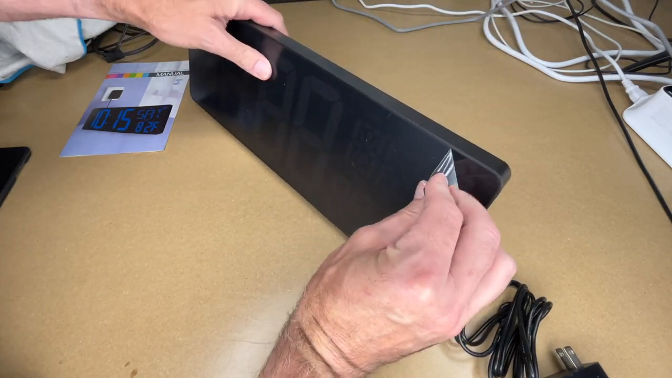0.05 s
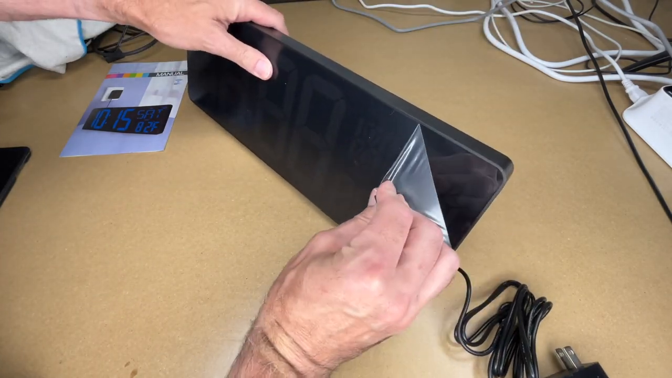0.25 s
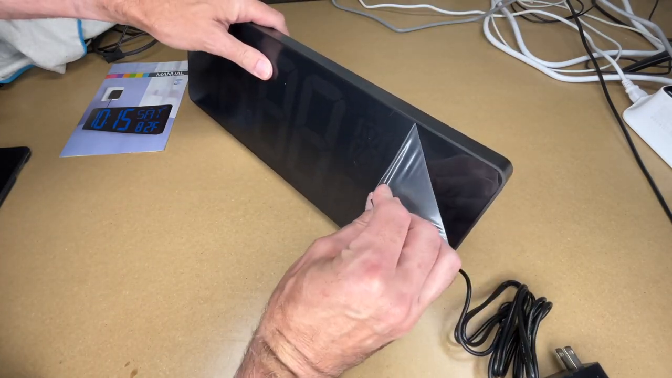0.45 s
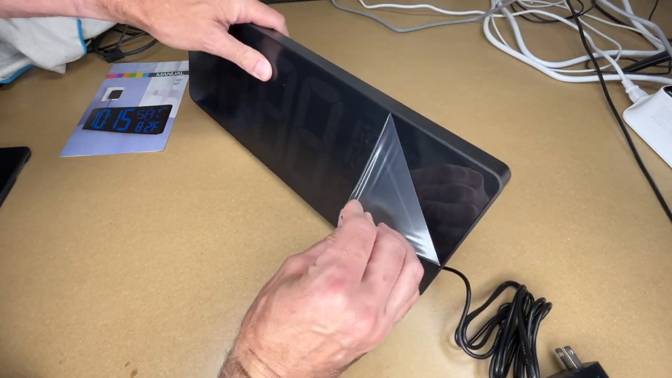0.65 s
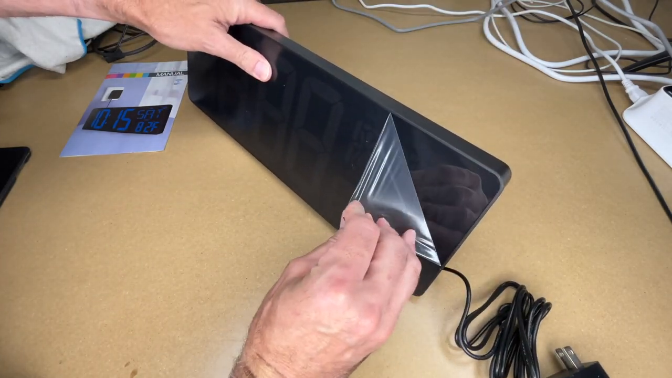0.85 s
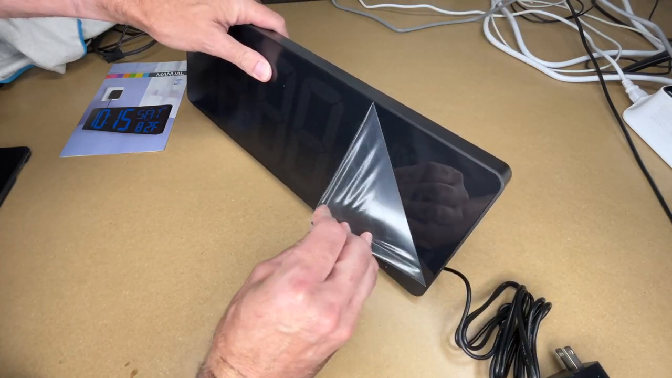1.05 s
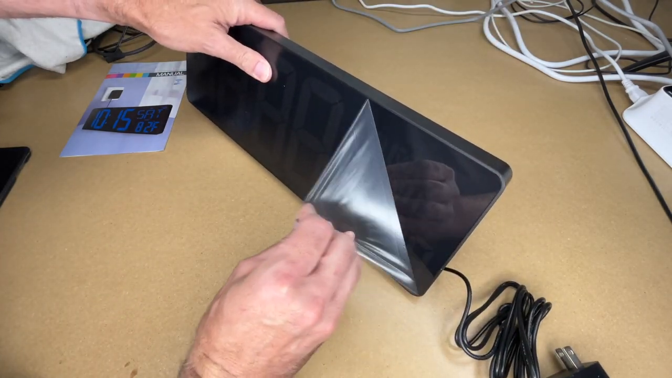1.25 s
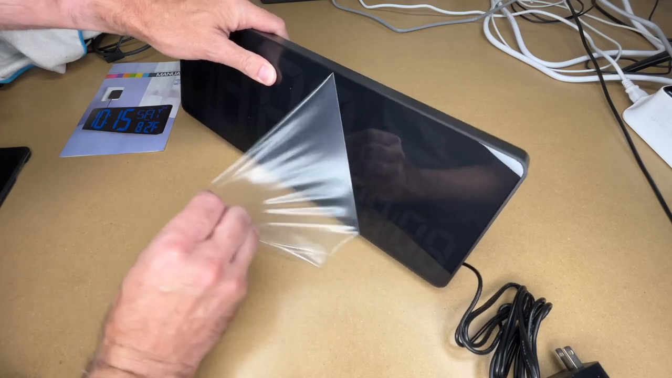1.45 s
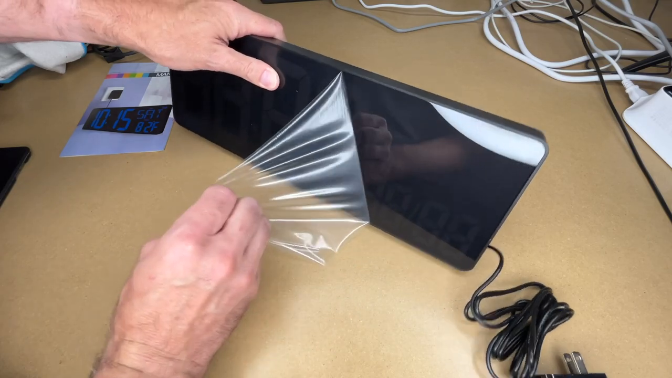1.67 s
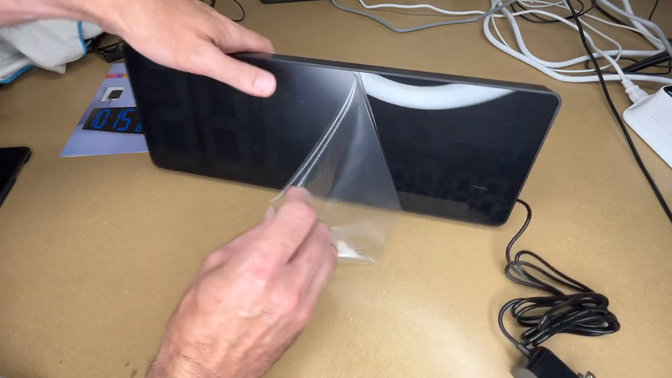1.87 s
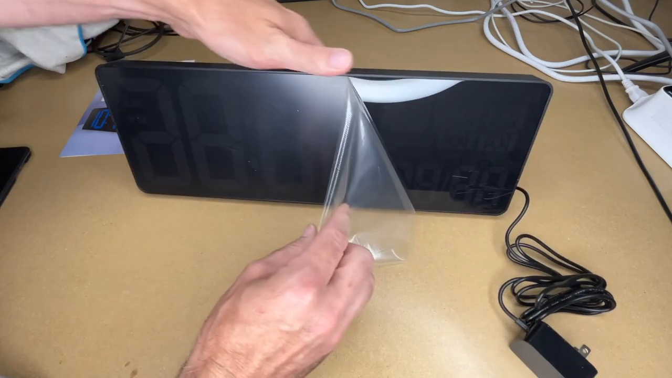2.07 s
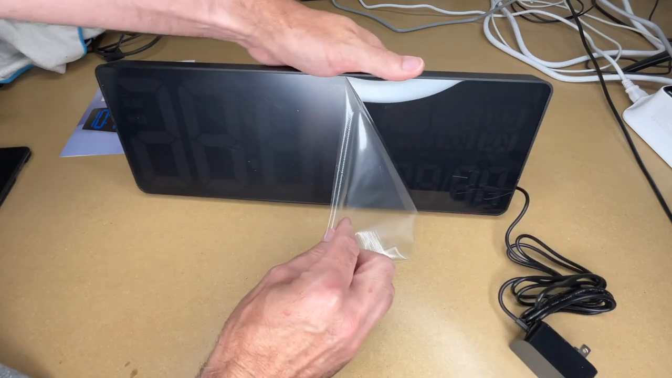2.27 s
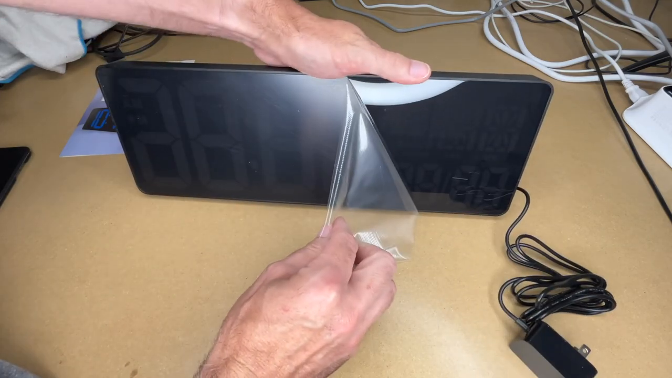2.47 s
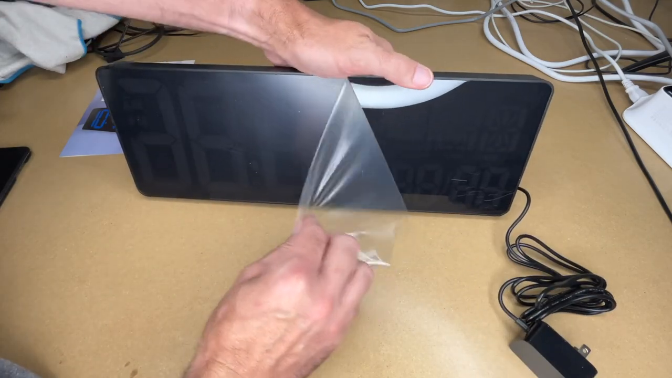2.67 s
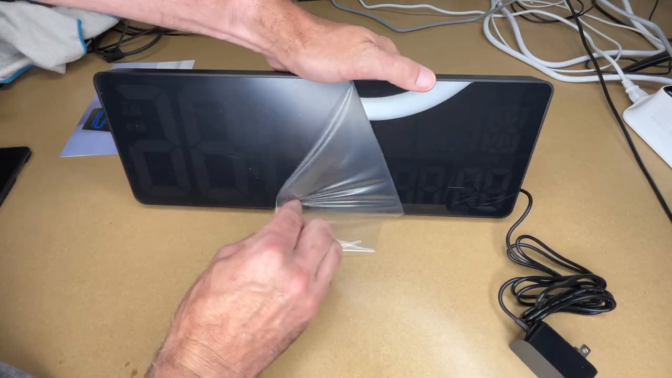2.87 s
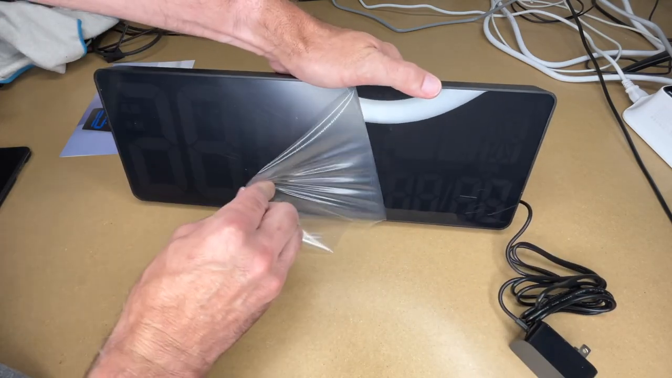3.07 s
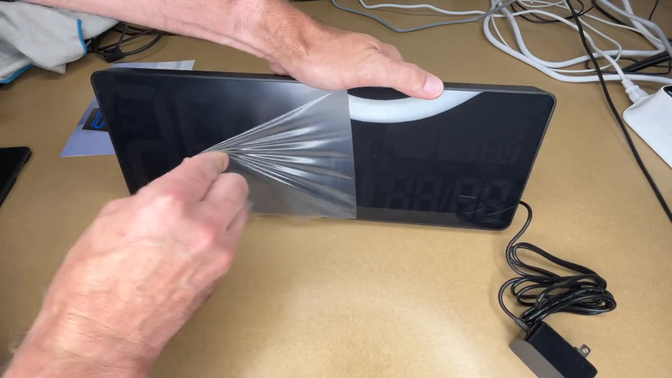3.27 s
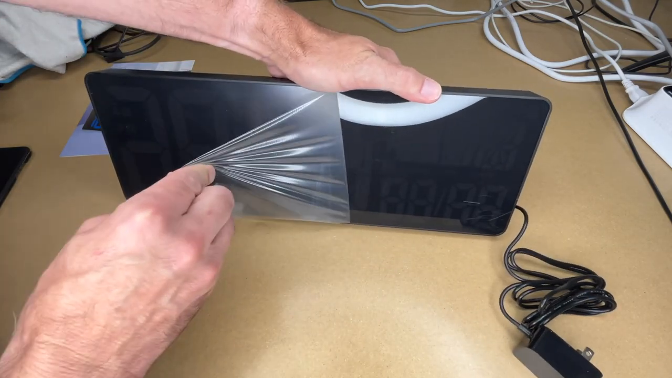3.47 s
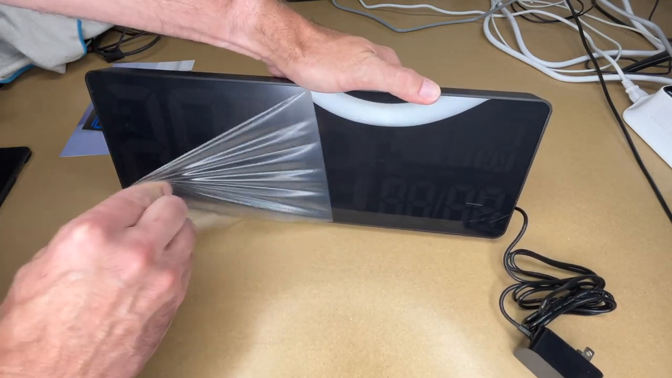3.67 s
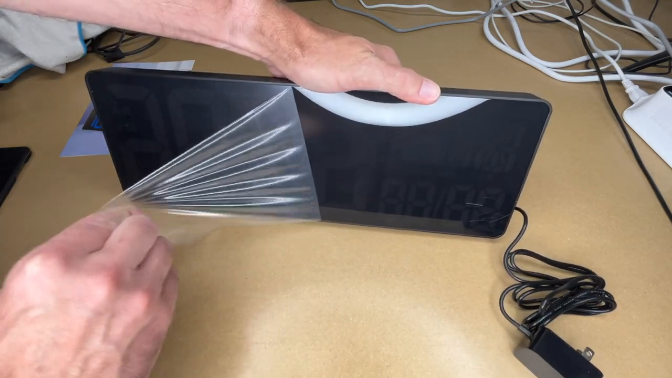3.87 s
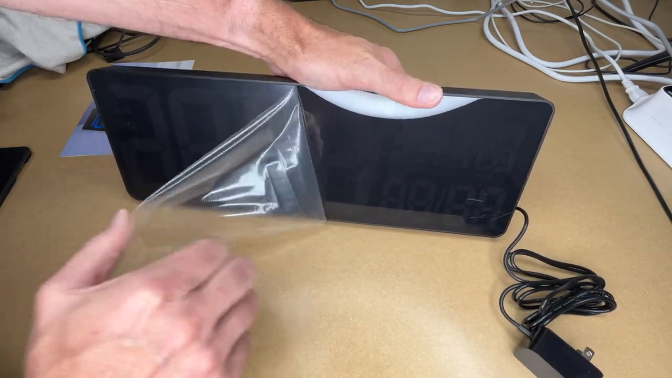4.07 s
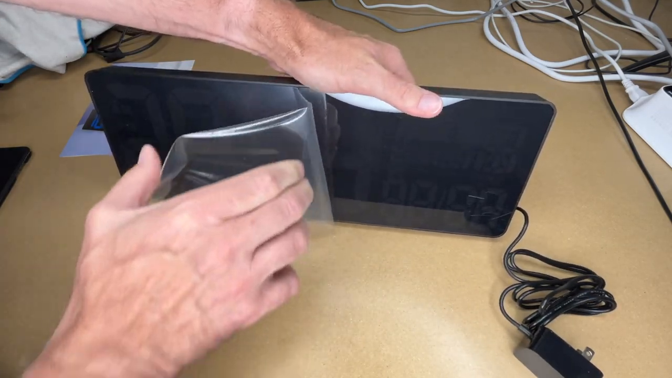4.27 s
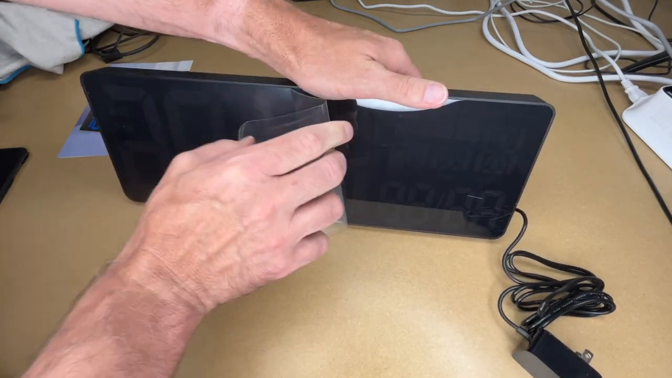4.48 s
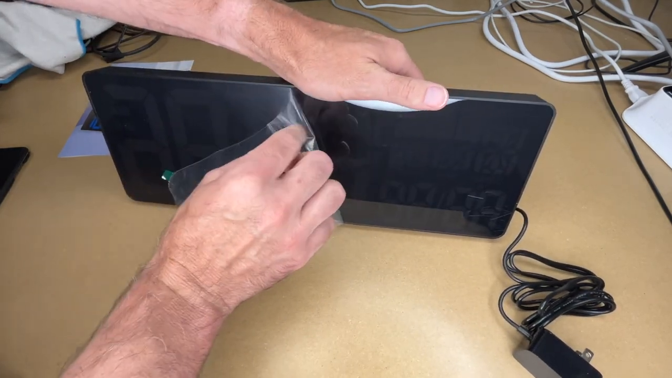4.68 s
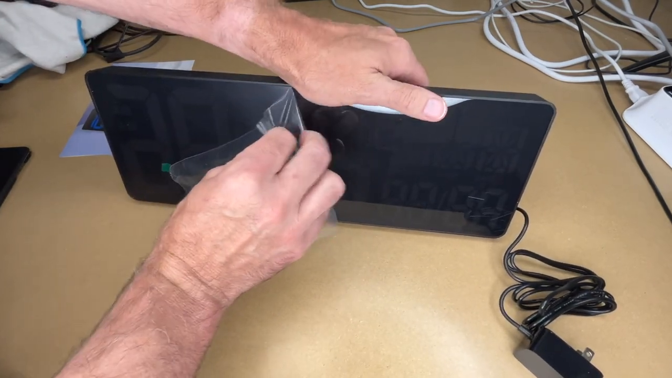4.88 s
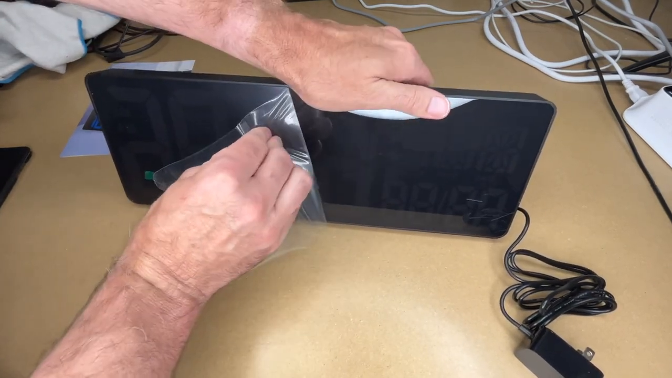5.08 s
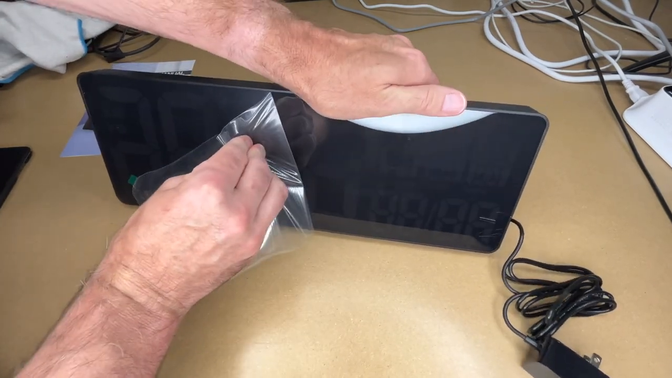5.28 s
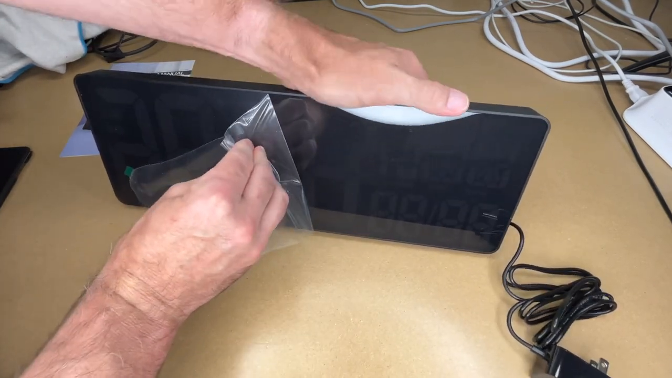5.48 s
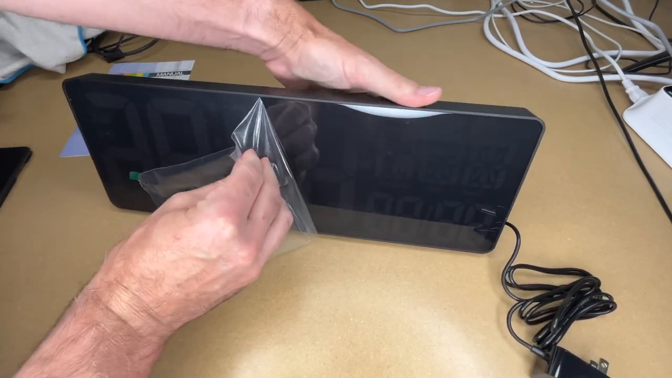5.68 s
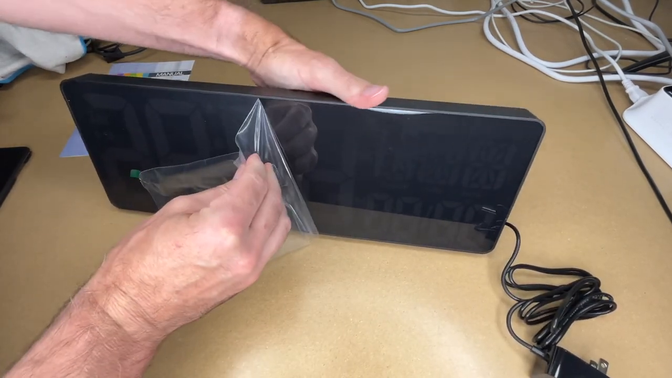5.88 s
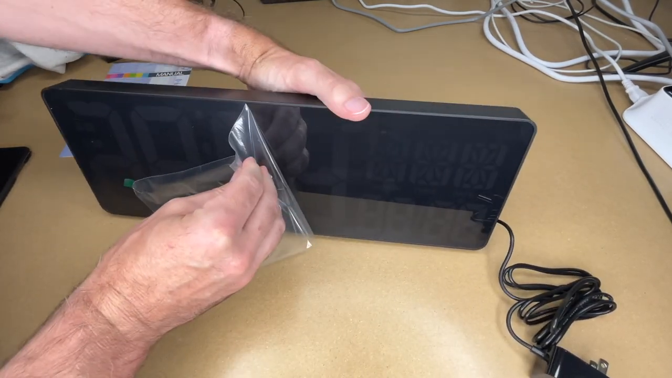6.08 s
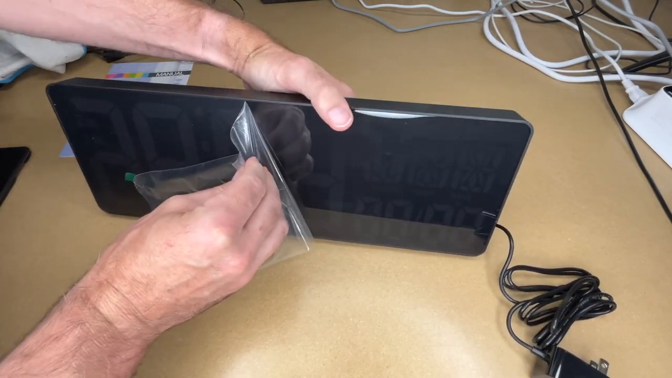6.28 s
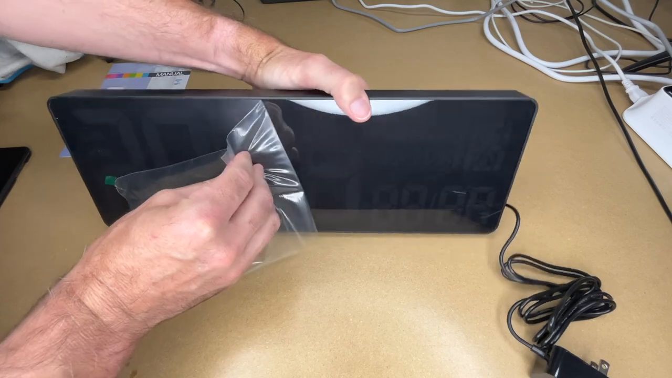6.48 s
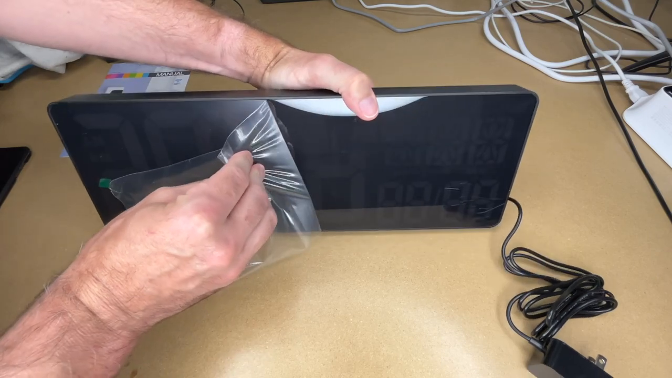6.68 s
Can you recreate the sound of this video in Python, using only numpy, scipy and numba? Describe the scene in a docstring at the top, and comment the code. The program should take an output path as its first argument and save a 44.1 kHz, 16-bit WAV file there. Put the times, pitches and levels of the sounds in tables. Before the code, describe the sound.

Sticky clear film rips from a hard panel in buzzing bursts, pauses, rips again, then quiet finger crinkles and soft knocks on a desk.

```python
"""A faint tap, then rasping bursts as protective film is pulled off a plastic panel on a desk; later, quieter crinkling.
The glue lets go in trains of slips, each a short ring of the taut film with a spit of treble.
Fingers rustle the film with dense tiny releases; the sheet drums, and the panel hums and knocks on the desk.
The desk booms when bumped. A small room adds short tails over faint air noise, the same in both channels."""
import sys
import numpy as np
from scipy import signal
from scipy.fft import rfft, irfft, next_fast_len
from scipy.io import wavfile
from scipy.ndimage import uniform_filter1d
from numba import njit

SR = 44100
rng = np.random.default_rng(int(sys.argv[2]) if len(sys.argv) > 2 else 0)


def wav_record(signal):
    """Record a signal, one row per channel, as 16-bit PCM in the file named by sys.argv[1]."""
    frames = np.transpose(np.atleast_2d(signal))
    bounded = np.clip(frames, -1, 1)
    # unit amplitude maps onto the largest positive 16-bit level
    quanta = np.round(bounded * 32767).astype(np.int16)
    wavfile.write(sys.argv[1], SR, quanta)


N = 297234  # length in samples

# Trains of glue slips: start_s, end_s, first_gap_ms, last_gap_ms, gap_unevenness (0-1), level_db,
# softer_at_start_db, film_pitch_hz, treble_against_body_db
SLIP_TRAINS = [(0.155, 0.284, 10.56, 22.3, .25, -20.5, 3.5, 1140, -0.5),
               (0.5244, 0.622, 6.56, 11.05, 0.09, -12, 15, 3555, -1),
               (0.92, 1.034, 10.06, 9, .12, -13, 2.5, 3040, -5),
               (1.0518, 1.079, 5.2, 23.5, .05, -12, 4, 3180, -6),
               (1.2605, 1.375, 6.6, 10, .08, -11, 2.5, 1458, -12),
               (3.2161, 3.293, 7.04, 15.1, .04, -12.5, -1.2, 1640, -6),
               (3.5571, 3.614, 6.5, 10.36, 0.11, -13, 3.5, 1629, -10),
               (3.6701, 3.732, 7.83, 9.5, .06, -12.5, -1.8, 2050, -11.5),
               (5.7172, 5.772, 8, 9, .12, -39, 2.9, 4120, 5)]
SWELL_S, SLOWING = 0.034, 3  # time constant of the swell; power that makes the gaps change late in a train
SLIP_SPREAD_DB, PITCH_SPREAD = 1.02, .2  # random level and pitch (natural log) from slip to slip


def slip_trains():
    """Stretched film sticks and slips; the gaps between slips drift from the first to the last value."""
    rows = []
    for start, end, gap_ms, last_ms, uneven, db, softer_db, hz, treble_db in SLIP_TRAINS:
        s = start
        for a, b, c, d in np.clip(rng.standard_normal((40, 4)), -2, 2):
            if s < end:
                soft_db = softer_db * np.exp(-(s - start) / SWELL_S)
                level_db = db - soft_db + SLIP_SPREAD_DB * a
                rows.append((s, level_db, hz * np.exp(PITCH_SPREAD * b), treble_db + 1.3 * c))
                progress = ((s - start) / (end - start)) ** SLOWING
                next_ms = gap_ms + (last_ms - gap_ms) * progress
                s += next_ms * np.exp(uneven * d) / 1000
    return rows


CREASES_PER_S, CREASE_DB, CREASE_HZ = 28, 2, 3300  # average rate, level over the rustle, middle pitch


def creases(rustle_db):
    """Small creases snap at random moments, their level following the rustling."""
    when = np.cumsum(rng.exponential(size=600)) / CREASES_PER_S
    a, b, c = rng.standard_normal((3, 600))
    under_db = rustle_db[np.minimum(when * SR, N - 1).astype(int)]
    rows = zip(when, under_db + CREASE_DB + 4 * a, CREASE_HZ * np.exp(0.29 * b), -5 + 5 * c)
    return [row for row in rows if row[0] < N / SR]


# Single snaps of the film: time_s, level_db, film_pitch_hz, treble_against_body_db
SINGLE_SNAPS = [(.4787, -61.5, 5000, 3.5), (.7598, -50, 4800, -6), (1.2422, -28, 1440, -1.5),
                (1.251, -18, 3250, -9.5), (1.4928, -21, 3800, -12), (1.5091, -23.5, 1460, -7),
                (2.1442, -51, 3130, -16), (2.5924, -55, 3250, -11), (2.6258, -41, 3200, -23.5),
                (2.6717, -47.5, 2980, -11.5), (2.6953, -48, 1530, -9), (3.018, -28.5, 3270, -1),
                (3.0949, -24, 3400, -8), (3.1162, -21, 3200, -6), (3.1327, -14.5, 1480, 1),
                (3.1986, -27, 2200, -3), (3.3374, -38.5, 2805, -2), (3.3839, -23.5, 4740, -6),
                (3.4244, -38.5, 3570, 0.5), (3.4857, -39.5, 1405, -14), (3.5411, -34, 1410, -3),
                (3.6551, -14, 1406, -11), (3.8009, -14.5, 1530, -11.5), (3.8136, -10.5, 1910, -17),
                (3.8375, -20, 1794, -10.5), (3.8543, -31, 1660, -13), (3.8922, -24.5, 4720, 3.5),
                (3.9021, -27.5, 4740, 5), (3.9687, -35, 4720, 3), (3.9749, -34.5, 1420, -1.5),
                (4.1624, -55.5, 3890, -11), (4.319, -57, 1590, -4), (4.4611, -49.5, 3530, -3.5),
                (4.4801, -42.5, 4260, -11), (4.5157, -32.5, 3200, 0), (4.6812, -44, 3430, 1.5),
                (4.7978, -42, 4490, 5), (4.8018, -43.5, 4330, 10), (4.9, -35, 4950, -2),
                (4.9107, -27, 4160, 7), (4.9143, -25.5, 1730, 1), (4.9194, -26, 1300, -4.5),
                (4.9594, -41, 1490, 8), (4.9822, -43.5, 4760, 3), (5.0786, -34, 1964, -9.5),
                (5.1849, -49.5, 3530, -10), (5.2663, -37, 1670, -11.5), (5.2992, -41.5, 3720, 3.5),
                (5.4803, -44, 3210, -19.5), (5.5034, -39, 4130, -23), (5.5529, -45.5, 1860, -9),
                (5.5777, -38.5, 1850, -7), (5.666, -34, 1650, -1), (5.6824, -36, 1480, 8),
                (5.6943, -31, 1710, 4), (5.7107, -42, 2840, -3), (5.816, -44.5, 3900, -16),
                (5.9546, -48.5, 3830, -15.5), (6.0009, -45.5, 4220, 6), (6.013, -41, 2910, 4.5),
                (6.1961, -53.5, 4970, -16), (6.4388, -38, 4520, 4.5), (6.4479, -33.5, 3390, -10),
                (6.4621, -33.5, 4800, -13), (6.4736, -33, 2200, -8), (6.48, -33, 1680, -8),
                (6.5143, -28, 3950, 0.5), (6.5305, -36.5, 4720, 10), (6.5464, -34, 3900, 6),
                (6.5571, -36.5, 3930, 6), (6.5743, -38, 4420, 6.5), (6.6415, -46.5, 4970, 12.5),
                (6.6563, -46.5, 3810, 6.5)]


def releases(rustle_db):
    """Every snap of the film as time_s, level_db, pitch_hz, treble_db: single snaps, trains and creases."""
    return list(SINGLE_SNAPS) + slip_trains() + creases(rustle_db)


# Tone colour of the tearing: frequency_hz, relative_level_db
RIP_COLOUR = [(200, -92.5), (600, -36), (1100, 3), (1500, 4.5), (3000, 3.5), (4500, 6), (6500, -21),
              (12000, -59)]
# Tone colour of the bright hiss: frequency_hz, relative_level_db
HISS_COLOUR = [(1000, -76), (3500, -22.5), (5000, 0), (7000, 3), (9000, -1), (11000, -5), (12000, -16),
               (13000, -21.5)]


def slips(rows):
    """Each release of glue rings the film for a few cycles and spits treble; also returns the bare pulses."""
    t = np.arange(SR // 50) / SR
    shape = (1 - np.exp(-t / .0004)) * amp(-60 * t / .012) / .53  # fast attack, 60 dB down in 12 ms
    tear = unit(coloured(rng.standard_normal(N), RIP_COLOUR))
    fizz = unit(coloured(rng.standard_normal(N), HISS_COLOUR))

    def sized(x):
        """Shape a sound, giving it the energy of an equally shaped sine of height 1."""
        shaped = x * shape
        return shaped * np.linalg.norm(shape) / np.linalg.norm(shaped) / 2 ** .5

    out, beat = np.zeros((2, N + SR))
    for (s, db, hz, treble_db), phase in zip(rows, rng.random(1000)):
        i = min(round(s * SR), N - len(t))
        at = slice(i, i + len(t))
        # starts 6% above the given pitch and sags as the film slackens
        ring = np.sin(2 * np.pi * (1.06 * hz * t * (1 - 40 * t) + phase))
        treble = amp(treble_db)
        mix = sized(ring + .75 * tear[at]) + treble * sized(fizz[at])
        out[at] += amp(db) * mix / np.hypot(1, treble)
        beat[at] += amp(db) * shape
    return out[:N], beat[:N]


# Pulls on the film: start_s, rise_s, hold_s, sag_db, rip_db, rip_pitch_hz, hiss_db, hiss_sag_db, drum_db,
# drum_pitch_from_hz, drum_pitch_to_hz, panel_db, panel_pitch_hz
FILM_PULLS = [(0.145, .04, 0.1, 7, -23, 1675, -19, 14.5, -28, 848, 790, -47.5, 195),
              (0.517, .026, 0.086, 12, -18.5, 3006, -20.5, 10.5, -23, 520, 400, -48, 206),
              (0.914, .025, .135, 9.5, -19.5, 2670, -17.5, 16.5, -26, 697.4, 379, -43, 200),
              (1.24, .055, 0.1, 9, -11.5, 1437, -13, 11.5, -22, 350, 380, -29.5, 185),
              (1.344, .025, 0.14, 11, -21, 1483, -30.5, -3, -23.5, 733.6, 810, -45.5, 180),
              (2.888, .026, 0.087, 24.5, -37, 3450, -42.5, 17, -46, 599, 562.6, -53, 186),
              (3.009, .008, 0.041, 8, -34.5, 2750, -35, 12.5, -41, 314.3, 322, -39.5, 183),
              (3.091, .01, 0.029, -3, -27.5, 2393, -34.5, -8.5, -38.5, 473.7, 500, -39, 172),
              (3.196, 0.022, .068, 3.8, -19.5, 1792, -26.5, 8.5, -29.5, 580, 530, -35, 166),
              (3.38, .005, .014, 20, -29, 3782, -46, -1, -43.5, 451, 455, -43, 170),
              (3.482, .006, 0.031, 4.5, -47.5, 1788, -45.5, 9, -59.5, 540, 520, -57, 172),
              (3.544, 0.027, 0.048, 9, -13.5, 1750, -20, 8.5, -26, 665, 610, -34, 150),
              (3.659, .03, 0.057, 19.5, -13.5, 2143, -42, -5, -24, 566, 520, -37, 148),
              (3.789, .025, 0.052, 16, -23.5, 1869, -42, -2, -33, 515.5, 520, -46, 155),
              (3.888, .006, .03, -1, -41, 4267, -29.5, 11, -54.5, 532.4, 535, -78, 196),
              (3.952, .022, .005, 11.5, -46.5, 2990, -44.5, 5.4, -49.5, 540, 541, -67, 199)]
# Fingers rustle the loose film: start_s, rise_s, hold_s, sag_db, rip_db, rip_pitch_hz, hiss_db
FINGER_RUSTLES = [(0.893, .006, .016, -7.5, -57, 2993, -61.5), (.752, 0.0041, 0.017, 9.5, -60, 4434, -55.5),
                  (1.718, .02, .16, -5, -63.5, 1600, -71), (1.876, .02, 0.17, 16, -57.5, 1600, -70.5),
                  (2.117, 0.028, 0.09, 8.5, -66.5, 3030, -70.5), (2.237, 0.029, .12, 8, -68, 1508, -76),
                  (2.594, 0.035, 0.097, -2, -62, 3010, -76.5), (2.7, 0.059, .005, 0.3, -58, 4168, -57),
                  (4.155, 0.0054, .02, 13.5, -59, 3810, -69.5), (4.271, 0.05, .05, 0.2, -77.5, 3010, -87.5),
                  (4.34, .01, .06, 1, -72.5, 3606, -90), (4.408, .008, .09, -7, -62.5, 3965, -64),
                  (4.503, .012, 0.018, 7, -50.5, 1558, -48), (4.665, .015, .04, 9, -63, 1741, -60),
                  (4.757, .008, 0.028, 4.7, -53, 4417, -46.5), (4.887, 0.02, .09, 28, -38.5, 2184, -34.5),
                  (5.071, .008, .03, 16, -50.5, 1925, -61), (5.117, 0.033, 0.1, -9, -71, 2000, -69.5),
                  (5.441, .07, .03, 14, -44, 3150, -61), (5.545, 0.02, 0.0054, 7.4, -52.5, 2725, -41),
                  (5.638, 0.016, .05, 8.5, -49, 2449, -56), (5.684, 0.059, 0.0091, 7.6, -34, 3596, -38),
                  (5.77, 0.013, .09, 9.5, -52, 3300, -76), (5.943, 0.0073, .03, 11.5, -50.5, 3750, -75),
                  (5.969, 0.03, .1, 24, -60.5, 3340, -55.5), (6.133, 0.057, 0.019, 2, -66, 3500, -81.5),
                  (6.252, 0.0047, 0.024, 2.5, -64.5, 1120, -79), (6.329, 0.0088, .03, 5, -68, 1400, -90),
                  (6.367, .01, 0.056, 1.3, -66, 3300, -71), (6.429, .025, 0.11, 22, -45.5, 3002, -35.5),
                  (6.626, 0.027, 0.008, 8.05, -71, 3960, -62)]
# The panel is shifted on the desk: start_s, rise_s, hold_s, sag_db, drum_db, drum_pitch_hz, panel_db, panel_pitch_hz
PANEL_SHIFTS = [(0, 0.022, 0.023, 11, -57.5, 523, -68, 172), (.893, 0.007, 0.02, -6, -58, 399, -76.5, 201),
                (1.66, 0.089, 0.18, -8.5, -52, 342.5, -53.5, 165.1),
                (1.841, 0.044, 0.089, 1, -49.5, 342.2, -42, 159.8),
                (2.05, .02, 0.21, 0.7, -70, 471, -78, 171),
                (2.319, .045, .005, 1.5, -56, 492.3, -66.5, 197.3),
                (2.63, .055, 0.14, 14.5, -57, 443.4, -66, 164.8),
                (2.771, .05, 0.087, 3, -68.5, 295.8, -67, 159.4),
                (2.941, 0.026, 0.055, -3, -49.5, 292.8, -54, 182.8),
                (4.147, 0.034, 0.0055, -1.7, -65, 603, -85.5, 190),
                (4.293, .05, .05, 2.7, -74, 337.4, -90.5, 192.7),
                (4.4, 0.14, 0.0077, -1, -56, 303, -60, 121.2),
                (4.563, 0.061, 0.072, 26.5, -52.5, 284.5, -50.5, 119.4),
                (4.738, 0.043, 0.0044, 5, -69, 428.3, -82, 144.2),
                (4.853, 0.081, 0.01, 15, -44, 552, -55, 172),
                (4.978, 0.045, 0.0023, 3, -64, 476.3, -94, 171.3),
                (5.13, 0.019, 0.15, -11, -65, 350, -70, 195.5),
                (5.414, 0.015, 0.14, 6, -53.5, 471.6, -66.5, 209.4),
                (5.566, .02, .07, -4, -67, 504.4, -88, 201.1),
                (5.638, 0.008, 0.017, -0.5, -60, 493.7, -81, 196),
                (5.793, 0.02, 0.073, 1, -49.5, 421.7, -69.5, 192.9),
                (5.95, 0.05, 0.065, 12, -68, 386.4, -69, 172),
                (6.178, .012, 0.025, 13, -53.5, 267.2, -48, 169.2),
                (6.249, 0.018, 0.018, 13, -37.5, 478.7, -75, 212),
                (6.332, .012, 0.021, 7.5, -43, 495, -69.5, 194.8),
                (6.415, 0.021, 0.14, 6.5, -46, 350, -43.5, 166)]
# Levels while the hands are still: rip_db, hiss_db, drum_db, panel_db
STILL_DB = [-87.5, -100, -115, -91.5]
HISS_RISE, DRUM_SAG, PANEL_SAG = 0.49, 0.76, 0.72  # shares of the rise and of the sag
LET_GO_DB, DRUM_LET_GO_DB = 11, 2  # drop when a pull stops; the sheet slackens


def controls():
    """Hand movements set the levels and pitches of rip, hiss, drum and panel; also the rustle level alone."""
    (s, rise, hold, sag, rip, rip_hz, hiss, hiss_sag,
     drum, from_hz, to_hz, panel, panel_hz) = np.transpose(FILM_PULLS)
    rs, r_rise, r_hold, r_sag, r_rip, r_hz, r_hiss = np.transpose(FINGER_RUSTLES)
    ms, m_rise, m_hold, m_sag, m_drum, m_hz, m_panel, m_panel_hz = np.transpose(PANEL_SHIFTS)
    long, r_long, m_long = rise + hold, r_rise + r_hold, m_rise + m_hold
    quick = HISS_RISE * rise
    rip_rest, hiss_rest, drum_rest, panel_rest = STILL_DB

    rustle_db = strokes(rip_rest, rs, r_rise, r_hold, r_sag, r_rip)
    pull_rip_db = strokes(rip_rest, s, rise, hold, sag, rip, LET_GO_DB)
    rip_db = np.maximum(rustle_db, pull_rip_db)
    rustle_hiss_db = strokes(hiss_rest, rs, r_rise, r_hold, r_sag, r_hiss)
    pull_hiss_db = strokes(hiss_rest, s, quick, long - quick, hiss_sag, hiss, LET_GO_DB)
    hiss_db = np.maximum(rustle_hiss_db, pull_hiss_db)
    shift_drum_db = strokes(drum_rest, ms, m_rise, m_hold, m_sag, m_drum)
    pull_drum_db = strokes(drum_rest, s, rise, hold, DRUM_SAG * sag, drum, DRUM_LET_GO_DB)
    drum_db = np.maximum(shift_drum_db, pull_drum_db)
    shift_panel_db = strokes(panel_rest, ms, m_rise, m_hold, PANEL_SAG * m_sag, m_panel)
    pull_panel_db = strokes(panel_rest, s, long / 2, long / 2, PANEL_SAG * sag, panel)
    panel_db = np.maximum(shift_panel_db, pull_panel_db)

    rip_pitch = held((s, long, rip_hz, rip_hz), (rs, r_long, r_hz, r_hz))
    drum_pitch = held((s, long, from_hz, to_hz), (ms, m_long, m_hz, m_hz))
    panel_pitch = held((s, long, panel_hz, panel_hz), (ms, m_long, m_panel_hz, m_panel_hz))
    return (rip_db, rip_pitch, hiss_db, drum_db, drum_pitch, panel_db, panel_pitch), rustle_db


FOOT_DB, LET_GO_S, RELEASE_DB_PER_S = 21, 0.0066, 384.5  # start under the peak; letting go; dying away


def strokes(rest_db, start, rise, hold, sag_db, db, drop_db=0):
    """Level in dB of movements that rise, hold while they sag, let go and die away; the loudest is heard."""
    t, level_db = np.arange(N) / SR, np.full(N, float(rest_db))
    for s, up, keep, sag, top in zip(start, np.abs(rise), np.abs(hold), sag_db, db):
        at = slice(max(round((s - .01) * SR), 0), round((s + up + keep + .3) * SR))
        when = s + np.cumsum([-.01, .01, up, keep, LET_GO_S, 1])
        end = top - sag - drop_db
        shape = [top - 3 * FOOT_DB, top - FOOT_DB, top, top - sag,
                 end - LET_GO_S * RELEASE_DB_PER_S, end - RELEASE_DB_PER_S]
        level_db[at] = np.maximum(level_db[at], np.interp(t[at], when, shape))
    return level_db


def held(*movements):
    """Pitch glides from one value to the other during each (start, length, from, to), then stays till the next."""
    rows = sorted(row for m in movements for row in zip(*m))
    nexts = [row[0] - .002 for row in rows[1:]] + [N]
    points = []
    for (s, long, a, b), end in zip(rows, nexts):
        points += [(s, a), (min(s + long, end - .001), b), (end, b)]
    return curves(points)[0]


def calm_and_slipping(beat, rip_db, hiss_db):
    """Strength of the steady handling, and the running mean of the slip pulses."""
    return amp(np.maximum(rip_db, hiss_db)), np.abs(uniform_filter1d(beat, size=1000))


def rustling_film(beat, rip_db, rip_hz, hiss_db):
    """Dense tiny releases rip and hiss where the glue does not slip."""
    calm, slipping = calm_and_slipping(beat, rip_db, hiss_db)
    smooth = calm / (calm + 6 * slipping)  # gives way to the slips
    grain = crackle(rate_hz=9500, spread_db=-3.0, life=0.00013)
    tearing = patchy(grain, depth_db=3) + .5 * resonate(grain, rip_hz, 6, SR)
    rip = unit(coloured(tearing, RIP_COLOUR))
    fine_grain = crackle(rate_hz=1000, spread_db=2.0, life=0.00027)
    hiss = unit(coloured(patchy(fine_grain, depth_db=2.5), HISS_COLOUR))
    return smooth * (amp(rip_db) * rip + amp(hiss_db) * hiss)


# Tone colour of the drumming sheet: frequency_hz, relative_level_db
DRUM_COLOUR = [(30, -50.5), (120, -32.5), (250, 7), (400, 1), (800, 3), (1300, -9.5), (4000, -86)]


def drumming_sheet(beat, rip_db, hiss_db, drum_db, drum_hz):
    """Slips and rough crackle push the taut sheet, which resonates like a drum skin."""
    calm, slipping = calm_and_slipping(beat, rip_db, hiss_db)
    kick = (beat + 1.5 * calm) / (slipping + 1.2 * calm)  # slips against their running mean
    push = kick ** .9 * crackle(rate_hz=390, spread_db=-3.5, life=0.009)
    drum = 2.6 * push + resonate(push, drum_hz, 5.5, SR)
    return amp(drum_db) * unit(coloured(drum, DRUM_COLOUR))


# Tone colour of the humming panel: frequency_hz, relative_level_db
PANEL_COLOUR = [(25, -35.5), (60, -24.5), (110, 9.5), (200, 8), (300, -27), (1000, -88.5)]


def humming_panel(panel_db, panel_hz):
    """Sparse crackle shakes the panel, which hums at a low moving resonance."""
    shake = crackle(rate_hz=60, spread_db=3, life=.008)
    hum = resonate(shake, panel_hz, 9., SR)
    return amp(panel_db) * unit(coloured(hum, PANEL_COLOUR))


def crackle(rate_hz, spread_db, life):
    """Noise broken into tiny releases of very uneven size, each fading with time constant life (s)."""
    happens = rng.random(N) < rate_hz / SR
    size = happens * amp(spread_db * np.minimum(rng.exponential(size=N), 4))
    shape = signal.lfilter([1], [1, -np.exp(-1 / (life * SR))], size)
    return unit(rng.standard_normal(N) * (unit(shape) + 0.8))


def patchy(x, depth_db):
    """Crumpled film colours its sound in patches of pitch and time."""
    z = signal.stft(x, nperseg=512)[2]
    across_pitch = uniform_filter1d(rng.standard_normal(z.shape), size=4, axis=0)
    field = uniform_filter1d(across_pitch, size=12, axis=1)
    return signal.istft(z * amp(depth_db * unit(field)), nperseg=512)[1][:N]


@njit
def resonate(x, hz, q, sr):
    """A resonance of unit noise gain whose pitch moves; a higher q rings longer."""
    y = np.zeros(len(x))
    for i in range(2, len(x)):
        r = np.exp(-np.pi * hz[i] / q / sr)
        drive = np.sqrt(1 - r * r) * (x[i] - x[i - 2]) / 2 ** .5
        y[i] = drive + 2 * r * np.cos(2 * np.pi * hz[i] / sr) * y[i - 1] - r * r * y[i - 2]
    return y


# The panel taps the desk: time_s, level_db, push_pitch_hz
PANEL_KNOCKS = [(0.016, -53, 530), (2.364, -55, 239.4), (2.379, -47.5, 518), (2.669, -50, 552),
                (5.264, -41.5, 308), (5.297, -41.5, 316), (5.429, -53, 350), (5.511, -44.5, 518),
                (6.185, -52, 177), (6.255, -35, 491), (6.335, -37.5, 478)]
# Ringing tones of the hollow panel case: pitch_hz, relative_level_db, time_to_fade_60_db_s
CASE_TONES = [(500, -10, 0.17), (350, -5.5, 0.11), (750, 4, 0.027), (1600, -10, 0.032), (2200, -32, 0.026)]


def knocks():
    """A tap gives a short low push, then the hollow case rings."""
    out, t = np.zeros(N + SR), np.arange(SR // 5) / SR
    for s, db, hz in PANEL_KNOCKS:
        ring = np.zeros(len(t))
        for f, level, t60 in CASE_TONES:
            ring += amp(level + rng.normal(0, 1.0) - 60 * t / t60) * np.sin(2 * np.pi * f * t)
        push = 1.7 * np.sin(2 * np.pi * hz * t) * amp(-60 * t / 0.1) * (1 - np.exp(-t / 0.0017))
        out[round(s * SR):][:len(t)] += amp(db) * (2.15 * ring * (1 - np.exp(-t / 0.012)) + push)
    return out[:N]


# The desk is bumped: time_s, level_db
DESK_BUMPS = [(4.41, -62), (4.468, -45), (4.534, -55), (4.608, -46), (4.649, -38), (4.691, -49),
              (4.75, -65)]
# Tone colour of the desk top: frequency_hz, relative_level_db
DESK_COLOUR = [(25, -20), (50, -5), (72, -1.5), (100, -5), (150, -61.5), (600, -94.5)]
BUMP_RISE_DB_PER_S, BUMP_FALL_DB_PER_S = 420, 550


def desk():
    """The desk top booms while it is bumped: low noise swells and falls around each bump."""
    t = np.arange(N) / SR
    bumps_db = [db - np.maximum(BUMP_RISE_DB_PER_S * (s - t), BUMP_FALL_DB_PER_S * (t - s))
                for s, db in DESK_BUMPS]
    level_db = np.max(bumps_db, axis=0)
    return amp(level_db) * unit(coloured(rng.standard_normal(N), DESK_COLOUR))


# How long the room rings: frequency_hz, time_to_fade_60_db_s
ROOM_FADE = [(200, 0.03), (1500, 0.17), (5000, 0.11), (11000, 0.064)]


def room(x):
    """Short noise tails fade at a speed set by pitch; three take turns so that like slips differ."""
    hz, t, z = signal.stft(rng.standard_normal((3, SR // 3)), SR, nperseg=256)
    fade = amp(-60 * t / along(ROOM_FADE, hz)[:, None])
    tails = signal.istft(z * fade, SR, nperseg=256)[1]
    turn = np.arange(N) // 310 % 3 == np.arange(3)[:, None]
    wet = signal.fftconvolve(x * turn, tails / np.linalg.norm(tails[0]), axes=1).sum(0)
    return np.pad(wet, (130, 0))[:N]  # the tail starts 130 samples late


# Tone colour of the air noise: frequency_hz, relative_level_db
AIR_COLOUR = [(24, -49.5), (40, -7.5), (301, 5), (1050, -6), (1620, -0.5), (1870, -18), (3850, -13.5),
              (6530, -16), (12500, -27.5), (16200, -67), (22000, -120)]
AIR_DB = -76.5


def air_noise():
    """Faint steady air noise: random samples given a fixed tone colour."""
    return amp(AIR_DB) * unit(coloured(rng.standard_normal(N), AIR_COLOUR))


def amp(db):
    """dB to gain."""
    return 10 ** (np.asarray(db) / 20)


def unit(x):
    """x at rms 1."""
    return x / np.sqrt(np.mean(x ** 2) + 1e-20)


def along(points, hz):
    """Read a curve of (frequency, value) points on a log frequency axis."""
    f, v = np.transpose(points)
    return np.interp(np.log(hz + 1), np.log(f + 1), v)


def curves(rows):
    """One value per sample for each column after the time."""
    s, *cols = np.transpose(rows)
    return [np.interp(np.arange(N) / SR, s, c) for c in cols]


def coloured(x, points):
    """x through a causal (minimum-phase) filter of the given tone colour."""
    m = next_fast_len(N + 8192)
    log_gain = np.log(amp(along(points, np.fft.rfftfreq(4096, 1 / SR))))
    # folding the cepstrum forward in time makes the filter causal
    cep = irfft(log_gain, 4096)
    cep[1:2048] *= 2
    cep[2049:] = 0
    impulse = irfft(np.exp(rfft(cep)), 4096)
    return irfft(rfft(x, m) * rfft(impulse, m), m)[..., :N]


def scene():
    """Film, panel and desk over faint air noise; the room answers the film."""
    control, rustle_db = controls()
    rip_db, rip_hz, hiss_db, drum_db, drum_hz, panel_db, panel_hz = control
    snaps, beat = slips(releases(rustle_db))
    rustle = rustling_film(beat, rip_db, rip_hz, hiss_db)
    drum = drumming_sheet(beat, rip_db, hiss_db, drum_db, drum_hz)
    hum = humming_panel(panel_db, panel_hz)
    echo = room(amp(-11) * snaps + amp(-5.5) * rustle)
    mono = snaps + rustle + drum + hum + knocks() + desk() + echo + air_noise()
    return np.array([mono, mono])


TOP_HZ = 12670  # nothing is left above this


def record(dry):
    """The loudest peaks are softly clipped; the top fades out over the last 900 Hz below the band limit."""
    dry = dry / (1 + np.abs(dry / .6) ** 5) ** (1 / 5)
    m = next_fast_len(N + 8192)
    edge = np.clip((TOP_HZ - np.fft.rfftfreq(m, 1 / SR)) / 900, 0, 1) ** 2
    return irfft(rfft(dry, m) * edge, m)[:, :N]


dry = scene()
out = record(dry)
wav_record(out)
```